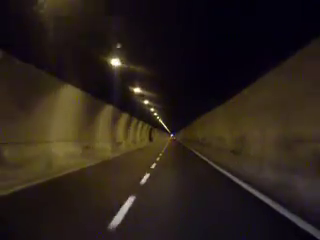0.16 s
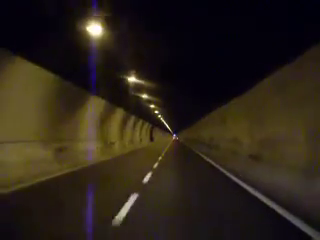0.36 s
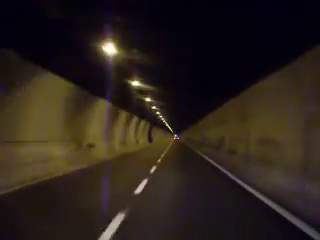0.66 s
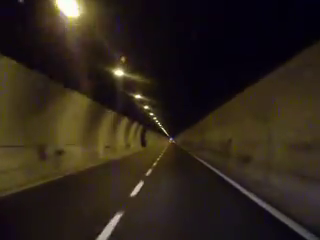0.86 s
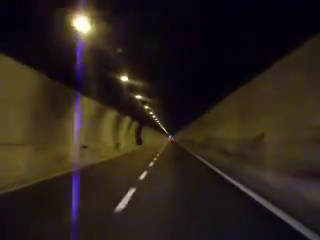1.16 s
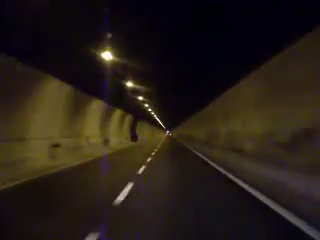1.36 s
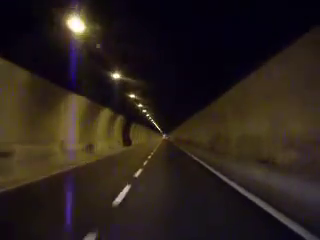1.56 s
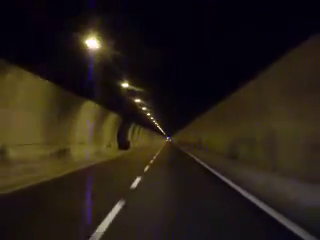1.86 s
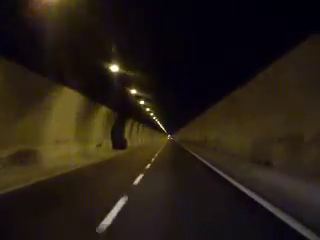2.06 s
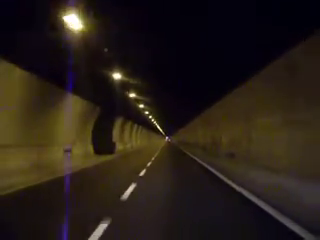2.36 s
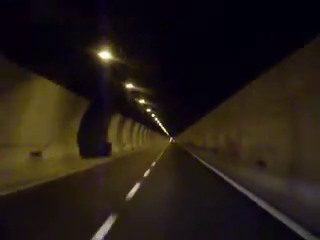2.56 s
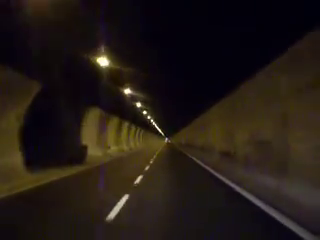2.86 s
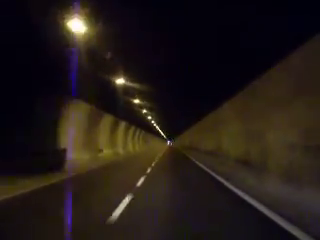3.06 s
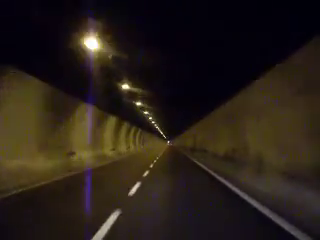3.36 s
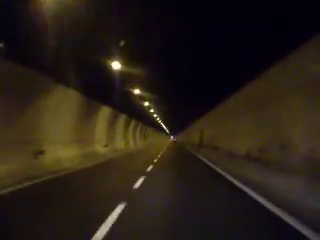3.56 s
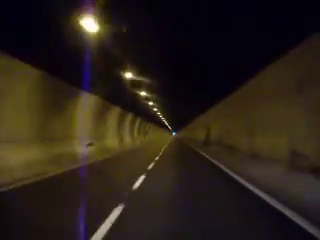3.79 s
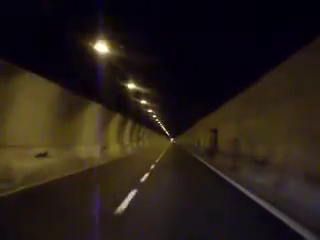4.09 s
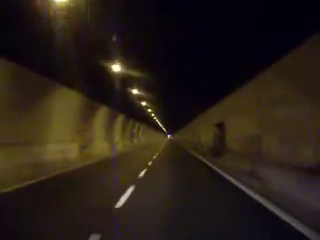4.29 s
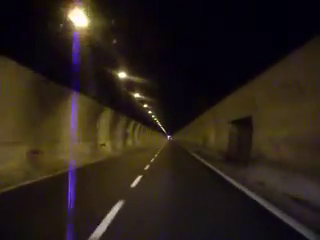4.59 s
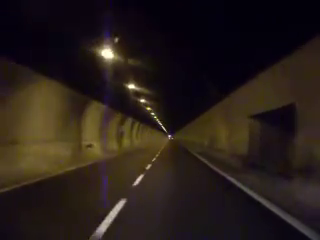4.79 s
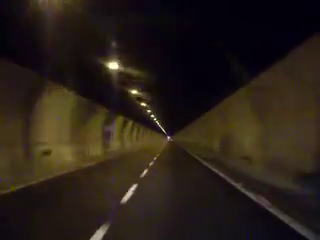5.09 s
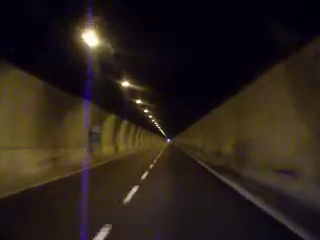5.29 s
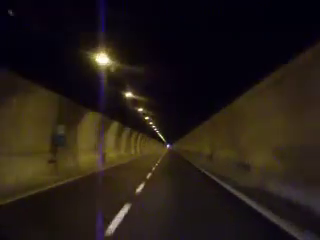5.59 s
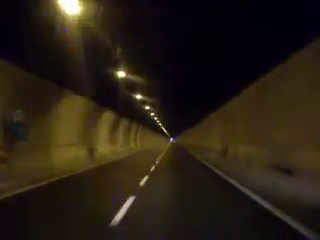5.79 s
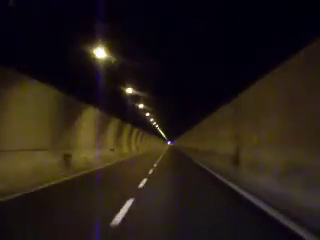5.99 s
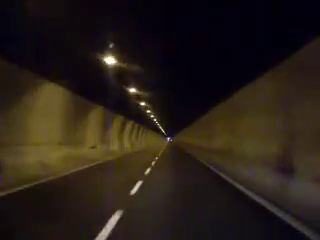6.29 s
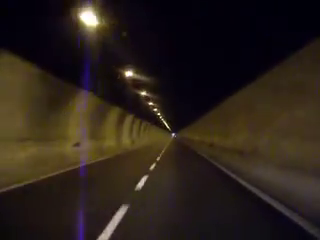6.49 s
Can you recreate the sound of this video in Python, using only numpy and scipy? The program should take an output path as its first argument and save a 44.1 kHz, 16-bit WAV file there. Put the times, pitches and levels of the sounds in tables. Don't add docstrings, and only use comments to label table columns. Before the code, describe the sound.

Heard from the windscreen inside a small car cruising through a tunnel: unbroken low boom, floor drone and hollow tyre roar reflected by the walls. Engine hum and thin gear whine rise very slightly. Wind and door seals hiss with quick flutters, and dashboard plastic ticks now and then, with the clearest knock just before three seconds.

```python
import sys
import numpy as np
from scipy import signal
from scipy.fft import rfft, irfft, next_fast_len
from scipy.io import wavfile
from scipy.ndimage import uniform_filter1d

SR = 44100
rng = np.random.default_rng(int(sys.argv[2]) if len(sys.argv) > 2 else 0)


def int16_out(signal):
    q = np.round(np.clip(np.atleast_2d(signal).T, -1, 1) * 32767)
    wavfile.write(sys.argv[1], SR, q.astype(np.int16))


def ratio_of_db(decibels):
    return 10 ** (np.asarray(decibels, float) / 20)


N = 293244
T = np.arange(N) / SR


def level(x, db):
    return x * ratio_of_db(db) / np.sqrt(np.mean(x ** 2))


def steady(x, db, span_s=.2):
    running_rms = np.sqrt(uniform_filter1d(x ** 2, int(span_s * SR)))
    return x * ratio_of_db(db) / running_rms


def curve(table):
    s, db = np.transpose(table)
    return np.interp(T, s, db)


def swells(rows):
    return sum(db * np.exp(-((T - s) / half_s) ** 2) for s, db, half_s in rows)


def walk(rate):
    k = int(SR / rate)
    held = np.repeat(rng.standard_normal(N // k + 1), k)
    slewed = uniform_filter1d(uniform_filter1d(held, k), k)
    return 1.3 * slewed[:N]


def rush(spectrum, flicker_db):
    size = next_fast_len(N)
    octave = np.log2(np.maximum(np.arange(size // 2 + 1) * SR / size, 1))
    hz, db = np.transpose(spectrum)
    noise = rfft(rng.standard_normal(size)) * ratio_of_db(np.interp(octave, np.log2(hz), db))
    out = 0
    for centre in np.arange(3, 15, 1 / 3):
        share = np.clip(1 - 3 * abs(octave - centre), 0, 1)
        if hz[0] / 2 < 2 ** centre < hz[-1] * 2:
            out = out + irfft(noise * share, size)[:N] * ratio_of_db(flicker_db * walk(9))
    return out


def ring(x, hz, width_hz):
    return signal.lfilter(*signal.iirpeak(hz, hz / width_hz, fs=SR), x)


def below(x, hz):
    return signal.sosfiltfilt(signal.butter(4, hz, fs=SR, output="sos"), x)


# pitch in Hz, level in dB.
WHISTLES = [(2544, -83), (5087, -85), (7187, -84), (7629, -87), (8813, -90.5), (10174, -89), (11876, -98)]


def camera_whistles():
    return sum(level(np.sin(2 * np.pi * hz * T), db) for hz, db in WHISTLES)


# pitch in Hz, peak in dB.
CREAK_TONES = [(2880, -50), (3100, -57), (3620, -56)]


def creak():
    start_s, rub_s = 3.2562, .003
    rub = np.exp(-((T - start_s) / rub_s) ** 2)
    return rub * sum(ratio_of_db(db) * np.sin(2 * np.pi * hz * T) for hz, db in CREAK_TONES)


# lag after the onset in seconds, strength as a factor.
TICK_SLIPS = [
    (.0008, .35),
    (.00174, 1),
    (.0032, .35),
    (.0044, .12),
]
# start in seconds, peak in dB, ring in Hz, body in dB, snap in dB.
TRIM_TICKS = [
    (.4095, -48, 3500, -10, -9),
    (1.5055, -45, 4000, 1, -14),
    (2.2135, -49, 3300, -12, -20),
    (2.7561, -33, 4250, 3, -14.5),
    (3.5104, -38.3, 4250, 3.5, -24),
    (3.7370, -45, 4200, -8, -20),
    (3.7590, -48, 2800, -12, -22),
    (4.6740, -51, 3800, -10, -12),
    (5.5230, -53, 7300, -12, 0),
    (6.2115, -49, 3300, -8, -14),
]


def trim():
    out = np.zeros(N)
    slip = np.zeros(SR // 50)
    for lag_s, strength in TICK_SLIPS:
        slip[int(lag_s * SR)] = strength
    for s, db, hz, body_db, snap_db in TRIM_TICKS:
        band = signal.butter(4, [.78 * hz, 1.3 * hz], "bandpass", fs=SR, output="sos")
        tick = level(signal.sosfilt(band, slip), 0)
        modes = [(hz, hz / 8, -9), (2300, 450, body_db), (7000, 1200, snap_db), (9600, 800, snap_db - 4)]
        for mode_hz, width_hz, mode_db in modes:
            once = ring(slip, mode_hz, width_hz)
            tick = tick + level(ring(ring(once, mode_hz, 2 * width_hz), mode_hz, 2 * width_hz), mode_db)
        i = int(s * SR)
        out[i:i + len(slip)] += tick * ratio_of_db(db) / abs(tick).max()
    return out


# pitch in Hz, width in Hz, level in dB.
DASH_MODES = [(968, 42, -60), (1077, 30, -66), (1310, 84, -76), (1502, 66, -72.5), (1637, 67, -68.5),
              (1897, 50, -71.5), (2060, 53, -70), (2380, 50, -74.5), (2800, 83, -73.5), (3040, 39, -81),
              (3190, 98, -80.5)]


def dash():
    shake = rng.standard_normal(N)
    return sum(level(ring(ring(shake, hz, w), hz, 2 * w), db) for hz, w, db in DASH_MODES)


CYCLE_ORDERS = [4, 9, 10, 11, 12, 13, 16, 17, 22]
ORDER_DB = [-51.5, -48.5, -51, -52, -50, -57.5, -58, -56, -59]
ORDER_DB_PER_S = [-1.1, -.1, 0, .2, .6, 0, 0, 0, 0]
# time in seconds, level in dB.
ENGINE_LOAD = [(0, -2), (.45, 2.5), (.9, -5.5), (1.3, 0), (1.9, -1.5), (2.45, 3.5), (2.75, 0.5), (3.3, 2.5),
               (4.2, 1.5), (4.7, -4), (5.1, 4.5), (5.45, 1), (5.7, 3.5), (6.1, 5), (6.65, 4)]


def engine(cycle):
    load_db = curve(ENGINE_LOAD)
    out = 0
    for order, db, db_per_s in zip(CYCLE_ORDERS, ORDER_DB, ORDER_DB_PER_S):
        tone = np.sin(order * cycle + 2 * np.pi * rng.random())
        out = out + level(tone, db + .7 * load_db + db_per_s * (T - T.mean()) + .8 * walk(4))
    return out


def wheel_throb(cycle):
    return level(np.sin(1.393 * cycle), -54 + 1.5 * walk(2))


# time in seconds, whine level in dB.
GEAR_LOAD = [(0, -68.5), (.9, -72), (1.9, -70), (2.1, -66.5), (2.55, -67), (2.65, -72), (2.78, -66.5),
             (3.4, -68), (3.6, -75), (3.85, -74), (4.0, -69.5), (5.7, -69.5), (5.95, -67.5), (6.65, -68.5)]


def gear_whine(cycle, order):
    tone = np.sin(order * cycle + .35 * walk(30))
    return level(tone, curve(GEAR_LOAD) + 1.8 + 1.6 * walk(7))


def drivetrain():
    whine_hz, gain_hz_per_s, whine_order = 2187, 6.2, 106
    cycle = 2 * np.pi * np.cumsum(whine_hz + gain_hz_per_s * T) / SR / whine_order
    return engine(cycle) + wheel_throb(cycle) + gear_whine(cycle, whine_order)


# time in seconds, puff in dB.
WALL_PUFFS = [(.01, 2), (.2, 2), (.32, 2), (.76, 2), (.95, 0), (1.2, 2.5), (1.35, 0), (1.59, 2),
              (2.13, 2.5), (2.22, -1.5), (2.36, 0), (2.48, 5), (2.92, 2.5), (3.7, 0.5), (4.05, 1.5),
              (4.35, 3), (4.53, -3), (4.68, 3), (5.14, 3), (5.29, 1), (5.6, 1), (5.7, 1), (6.1, 0),
              (6.64, -3.5)]


def wall_puffs():
    return swells((s, db, 0.032) for s, db in WALL_PUFFS)


# frequency in Hz, density in dB per Hz.
SEAL_COLOUR = [(2500, -15), (5000, -7), (7000, 1.5), (10000, -1), (10600, -4), (11500, -9.5), (12000, -9),
               (12400, -16), (14000, -27)]


def door_seals(echo_db, puff_db, gust):
    leak_db = -70 + .45 * echo_db + .8 * puff_db + 0.6 * gust + .6 * walk(30)
    return steady(rush(SEAL_COLOUR, .3), leak_db)


# frequency in Hz, density in dB per Hz.
WIND_COLOUR = [(2300, -31.5), (2450, 0), (2650, -0.5), (2830, 0), (3000, -2), (4200, -7), (5800, -12),
               (7500, -22.5), (10000, -41.5)]


def wind(echo_db, puff_db, gust):
    return steady(rush(WIND_COLOUR, 0.35), -59 + 0.57 * echo_db + 0.31 * puff_db + 0.46 * gust)


# time in seconds, coarseness in dB.
ASPHALT_GRAIN = [
    (0, -0.5),
    (1.0, -0.5),
    (2.2, -1),
    (2.95, 0.5),
    (3.9, 1),
    (4.4, 2),
    (5.5, -0.5),
    (6.65, -1.5),
]


def coarseness():
    return curve(ASPHALT_GRAIN)


# frequency in Hz, density in dB per Hz.
ROAR_COLOUR = [(520, -51), (590, 0.5), (720, -5.5), (800, -3), (860, -9.5), (960, -6.5), (1060, -9.5),
               (1110, -14.5), (1500, -17.5), (1570, -20.5), (1640, -16), (1990, -21), (2400, -21.5),
               (2500, -47)]
# time in seconds, swell in dB,
# half length in seconds.
TREAD_SWELLS = [(.37, 1, 0.046), (.55, -2.5, .05), (.8, -2, .04), (1.2, -2.5, .05), (1.76, 2, .08),
                (2.1, 0.5, .06), (2.55, 0.5, .08), (2.82, 1.5, .05), (2.96, 0, 0.067), (3.12, 2, 0.045),
                (3.4, 2.5, 0.11), (3.7, -0.5, 0.092), (4.2, -1, .05), (4.68, -1, 0.07), (4.8, 2, .04),
                (5.0, -1.5, 0.12), (5.22, 2.5, .05), (5.6, 1, 0.071), (5.86, -1.5, .07), (6.1, -1, .08),
                (6.4, 2, .05)]


def tyre_roar(echo_db, gust):
    coarse_db = coarseness()
    roar = steady(rush(ROAR_COLOUR, 0.27), -41)
    floor_pan = below(roar, 1100)
    glass = roar - floor_pan
    floor_db = 0.69 * coarse_db + 0.22 * echo_db + swells(TREAD_SWELLS)
    return floor_pan * ratio_of_db(floor_db) + glass * ratio_of_db(0.99 * echo_db + .55 * gust)


# time in seconds, echo in dB.
WALL_ECHO = [(0, -2), (.35, -0.5), (.75, -1), (.92, 0), (1.3, 0.2), (1.7, 1.1), (2.0, 0), (2.3, 1),
             (2.6, 0), (2.8, 0), (3.35, 0), (3.6, -1.5), (3.85, -0.5), (5.0, -0.1), (5.6, 0.9), (6.0, 0.5),
             (6.35, 0.3), (6.65, .5)]


def air():
    echo_db, puff_db, gust = curve(WALL_ECHO), wall_puffs(), walk(26)
    return tyre_roar(echo_db, gust) + wind(echo_db, puff_db, gust) + door_seals(echo_db, puff_db, gust)


# pitch in Hz, width in Hz, level in dB.
PANEL_MODES = [(528.3, 35.6, 2.5), (542, 28.6, 0), (559.3, 17.5, -3), (511, 44, -9), (579.3, 30, -8.5)]
# time in seconds, swell in dB, half length in seconds.
RIBBED_PATCHES = [(.15, 4.5, 0.068), (.36, 4, .06), (.62, 4, 0.14), (.88, 2.5, .08), (1.25, -2.5, 0.073),
                  (1.45, -4, .05), (1.65, 2.5, 0.16), (1.83, -3, .03), (2.05, 4, .1), (2.24, 6, 0.11),
                  (2.5, 0.5, 0.069), (2.8, 7, 0.061), (3.0, 4, .1), (3.2, -0.5, .03), (3.35, 2.5, 0.17),
                  (3.6, 1.5, 0.13), (3.8, -1.5, 0.047), (4.0, 4, 0.06), (4.22, 6, 0.14),
                  (4.45, -4.5, 0.033), (4.56, 8.5, 0.027), (4.8, 5.5, 0.064), (4.94, 7, .05),
                  (5.07, -1, .04), (5.22, 3.5, 0.085), (5.6, 3, 0.56), (6.1, -1, 0.084), (6.42, 4, 0.18)]


def panels(coarse_db):
    out = 0
    for hz, width_hz, db in PANEL_MODES:
        mode = ring(ring(rng.standard_normal(N), hz, width_hz), hz, 1.8 * width_hz)
        out = out + ratio_of_db(db + 1.5 * walk(3)) * mode
    return steady(out, -41 + 0.18 * coarse_db + swells(RIBBED_PATCHES) + 0.47 * walk(11))


# frequency in Hz, density in dB per Hz.
DRONE_COLOUR = [(170, -41.5), (210, -5), (260, -4), (305, 0.5), (350, -3.5), (400, -2.5), (435, -7),
                (480, -14.5), (520, -27.5)]
# time in seconds, swell in dB.
ROAD_RIPPLES = [(.35, 1), (1.1, 2.5), (1.57, 1.5), (1.9, 0.5), (2.33, 1.5), (2.8, 2.5), (3.05, 2.5),
                (3.55, 2.5), (4.2, -1), (4.48, 1.5), (4.8, 0), (5.0, 3), (5.26, 1.5), (5.52, 2.5),
                (5.83, 4.5), (6.13, 1.5)]


def floor_drone(coarse_db):
    ripple_db = swells((s, db, 0.06) for s, db in ROAD_RIPPLES)
    return steady(rush(DRONE_COLOUR, 0.16), -39 + 0.93 * coarse_db + ripple_db)


# frequency in Hz, density in dB per Hz.
BOOM_COLOUR = [(5, -38.5), (14, -7), (22, -7), (45, -5), (64, -8), (74, 1), (110, -1), (150, 1.5),
               (180, -2), (215, -13), (250, -24.5)]
# time in seconds, jolt in dB.
ROAD_JOINTS = [(.2, 0), (.52, 1), (1.19, 1.5), (1.52, -2), (1.98, 3), (2.27, -2), (2.6, 0.5), (3.05, 3),
               (3.39, 5.5), (3.7, 4.5), (4.03, 4), (4.44, 3.5), (4.79, 5.5), (5.14, 1.5), (5.71, 1),
               (6.22, 3.5), (6.6, 4)]
# time in seconds, heave in dB, half length in seconds.
ROAD_HEAVES = [(.2, 3, .2), (.82, -6, 0.065), (1.1, 3.5, 0.18), (1.55, 4, 0.072), (2.2, 1.5, .1),
               (2.55, 2, .15), (3.1, 1, 0.27), (3.95, 0, .15), (4.25, -8, 0.11), (4.5, 1.5, .15),
               (5.0, -9, 0.093), (5.15, 3, .08), (5.75, 4.5, 0.056), (6.1, -1.5, .1), (6.5, 2.5, 0.081)]


def cabin_boom(coarse_db):
    jolt_db = swells((s, db, 0.065) for s, db in ROAD_JOINTS)
    body = rush(BOOM_COLOUR, 1.0)
    seat = below(body, 123.4)
    cabin = body - seat
    seat_boom = steady(seat, -43.5 + .2 * coarse_db + jolt_db)
    return seat_boom + steady(cabin, -43 + 0.5 * jolt_db + swells(ROAD_HEAVES))


def road():
    coarse_db = coarseness()
    return cabin_boom(coarse_db) + floor_drone(coarse_db) + panels(coarse_db)


def scene():
    details = camera_whistles() + creak() + trim() + dash()
    return (details + drivetrain() + air() + road())[None]


def low_pass(x):
    return signal.sosfilt(signal.butter(12, 12260, fs=SR, output="sos"), x)


def record(dry):
    squeeze = 5
    rounded = np.tanh(squeeze * dry) / squeeze
    rolled = signal.sosfiltfilt(signal.butter(6, 11300, fs=SR, output="sos"), rounded)
    return low_pass(rolled)


dry = scene()
out = record(dry)
int16_out(out)
```